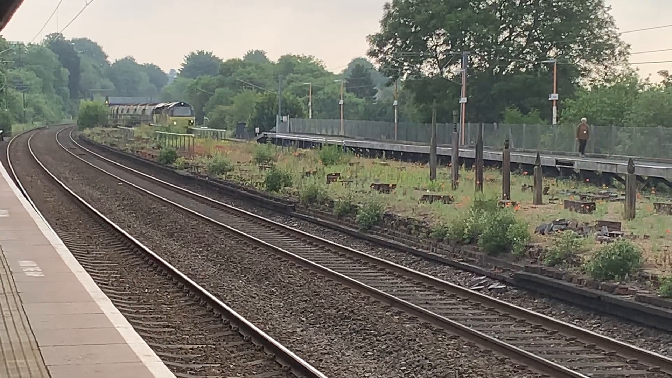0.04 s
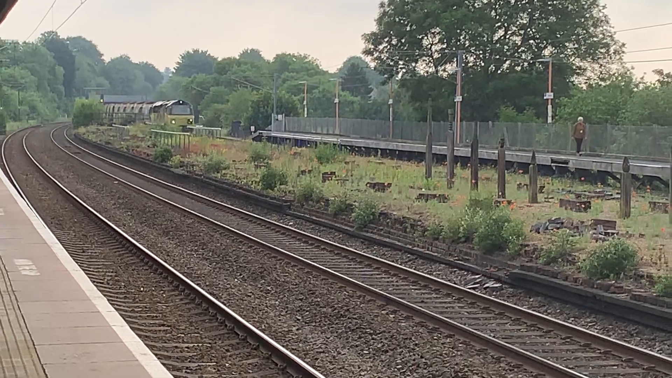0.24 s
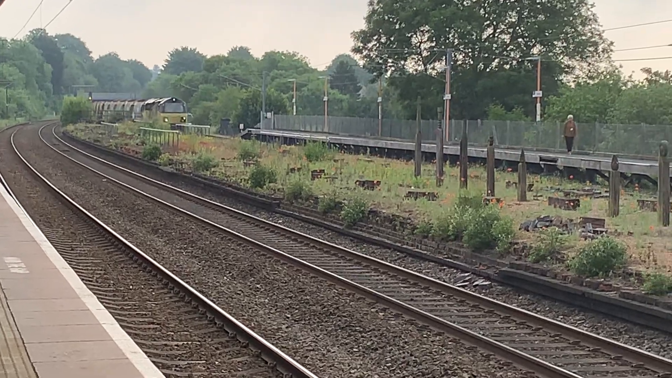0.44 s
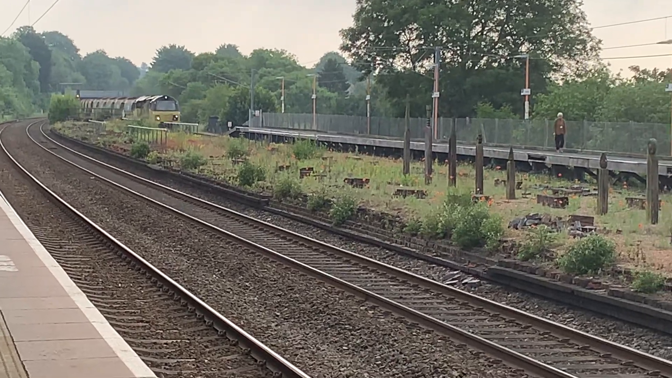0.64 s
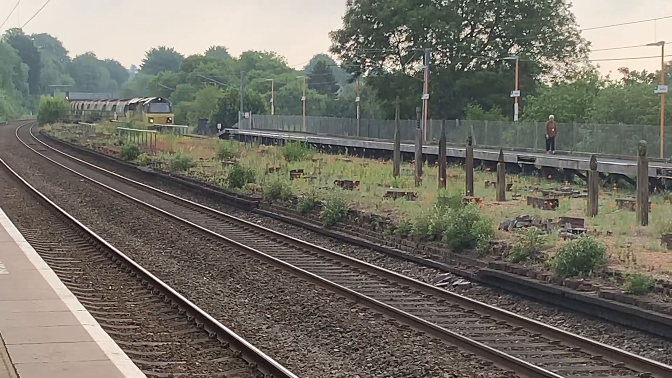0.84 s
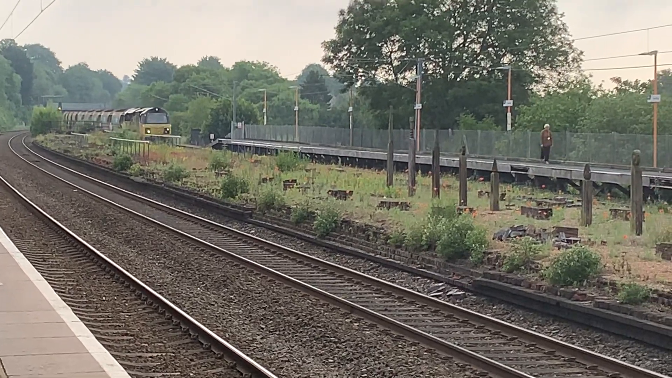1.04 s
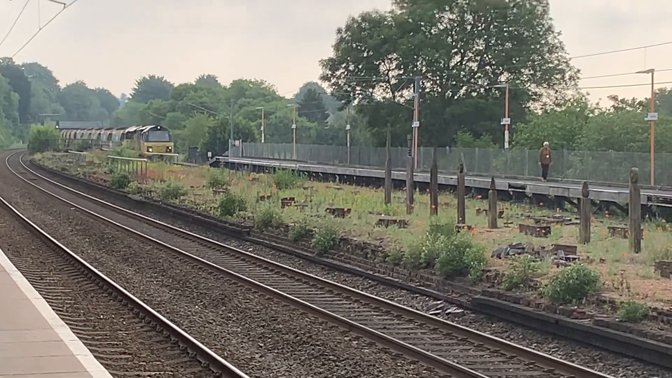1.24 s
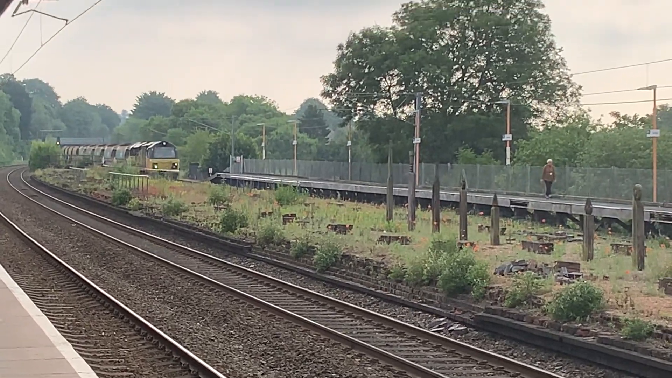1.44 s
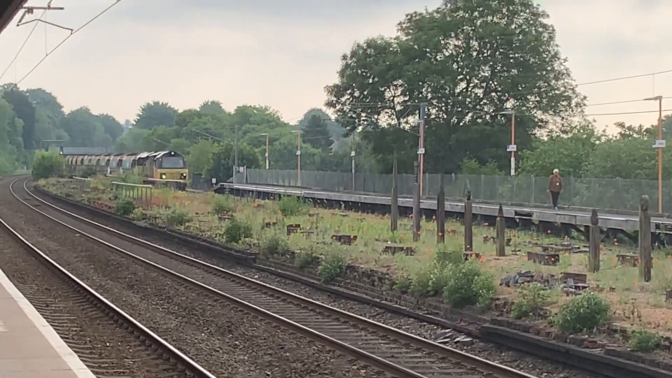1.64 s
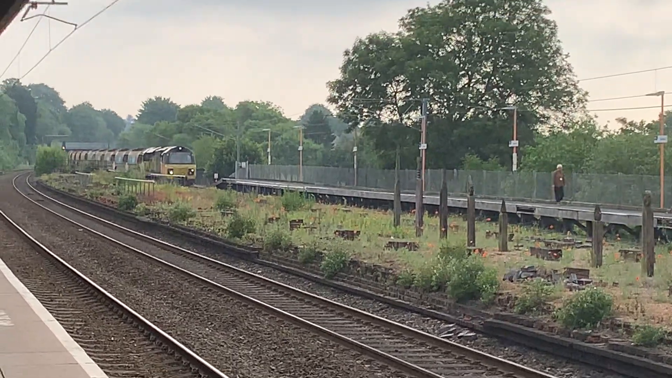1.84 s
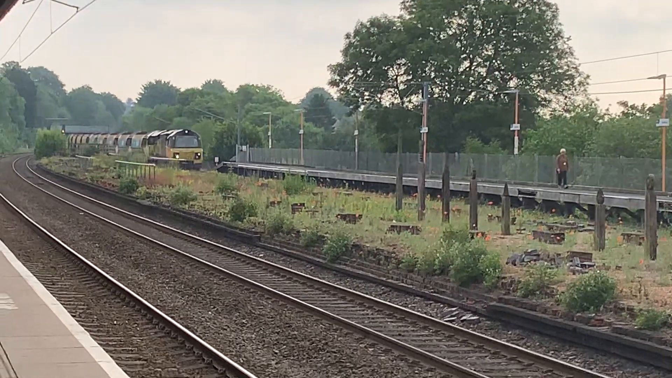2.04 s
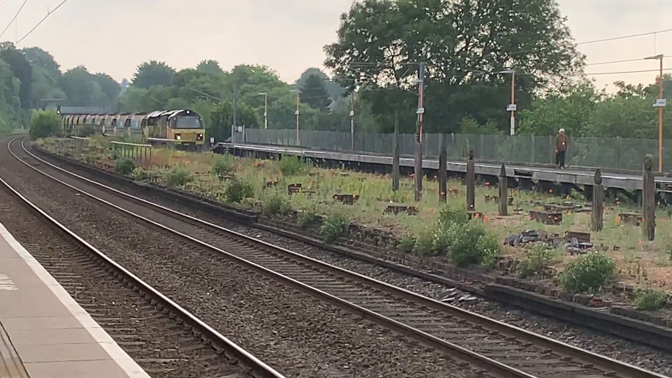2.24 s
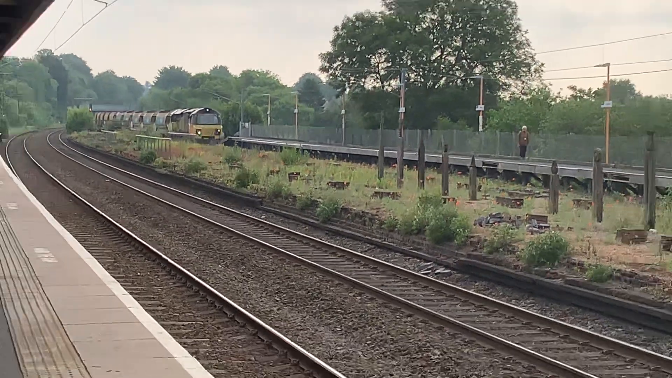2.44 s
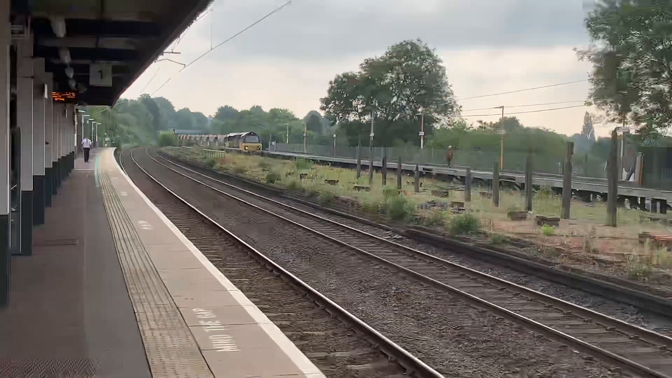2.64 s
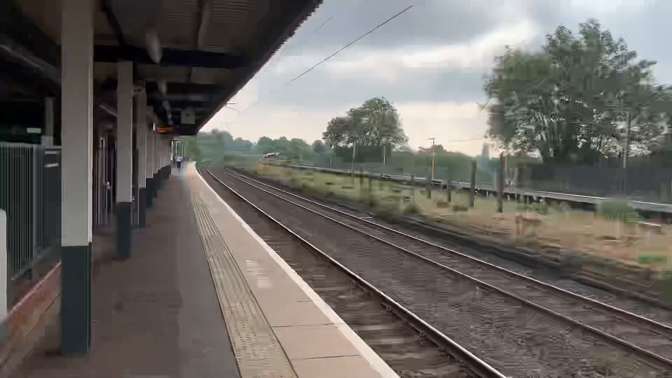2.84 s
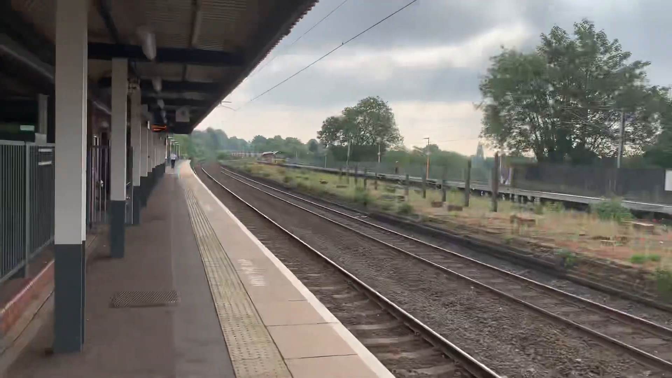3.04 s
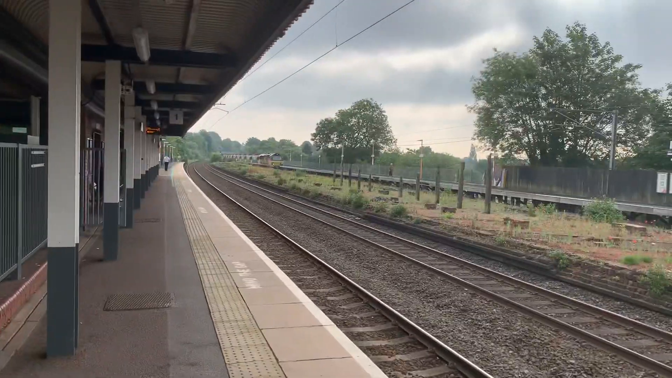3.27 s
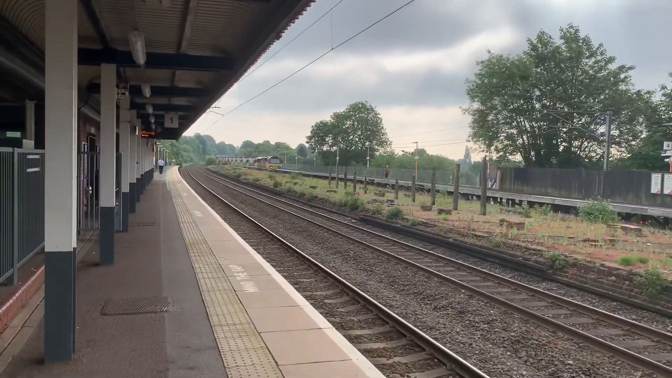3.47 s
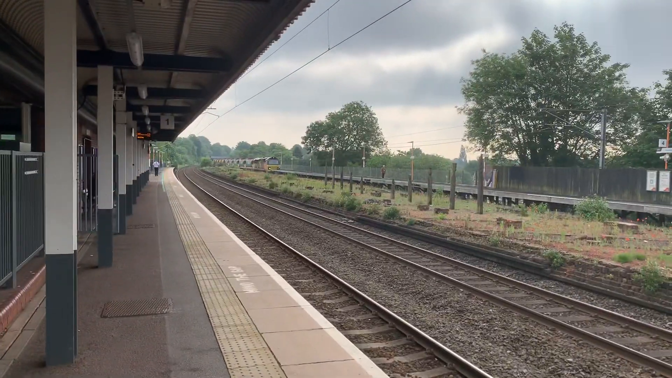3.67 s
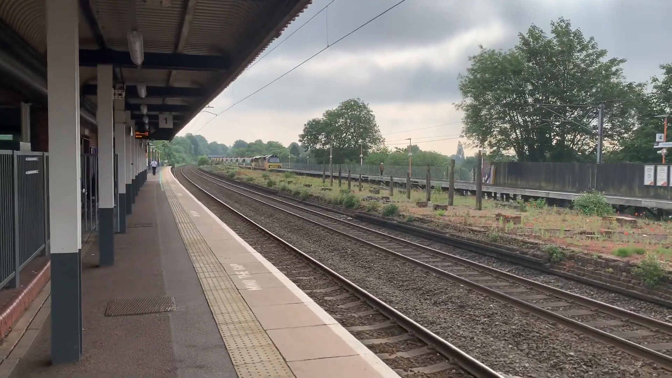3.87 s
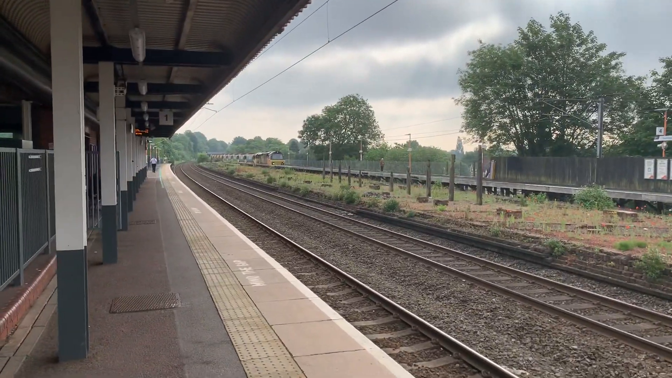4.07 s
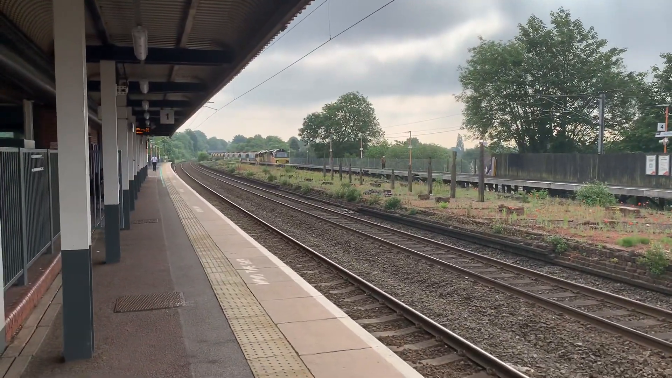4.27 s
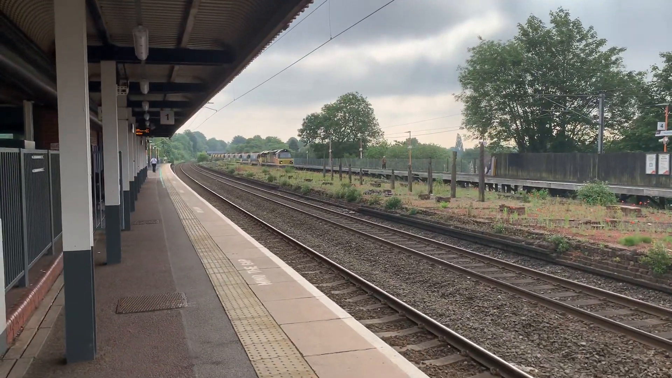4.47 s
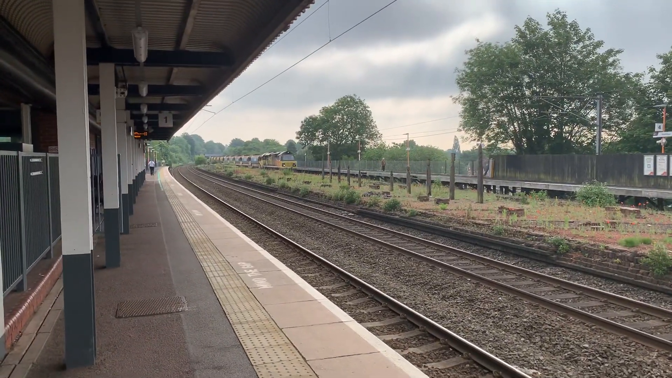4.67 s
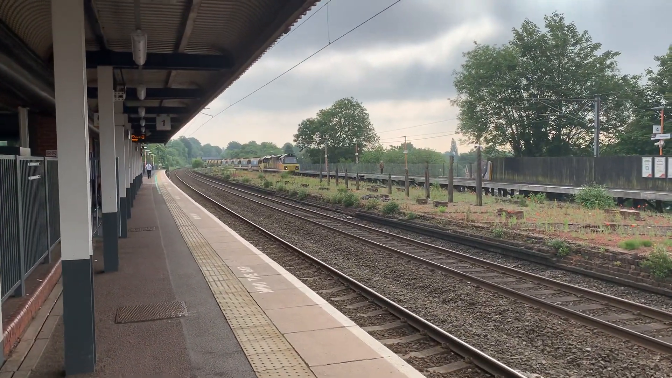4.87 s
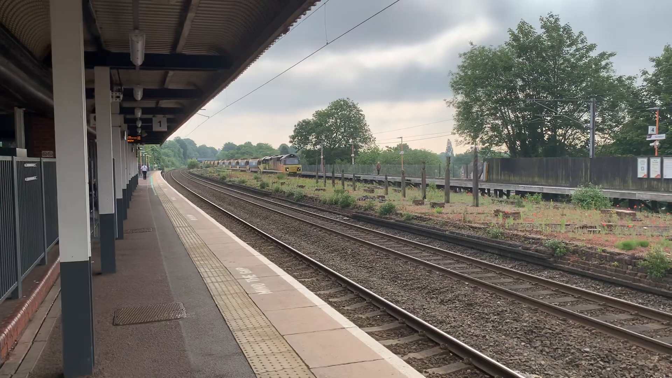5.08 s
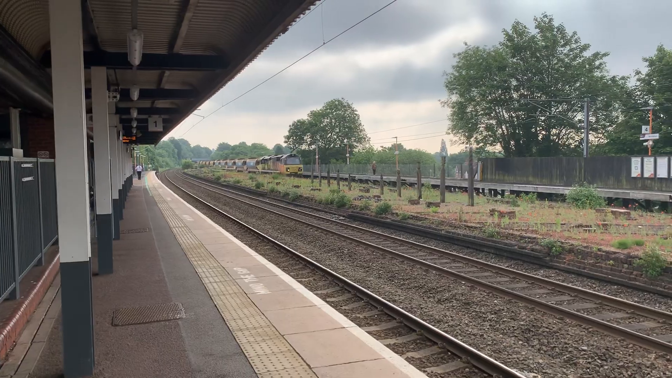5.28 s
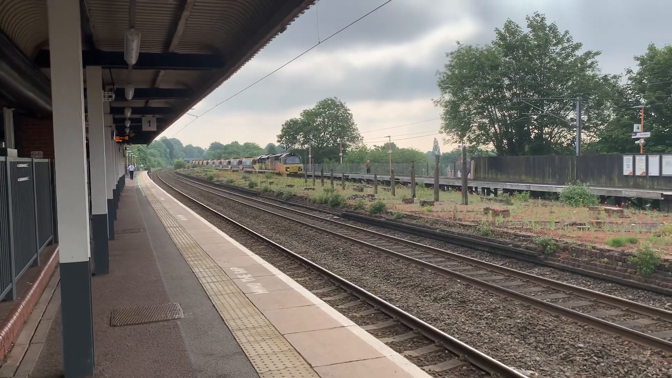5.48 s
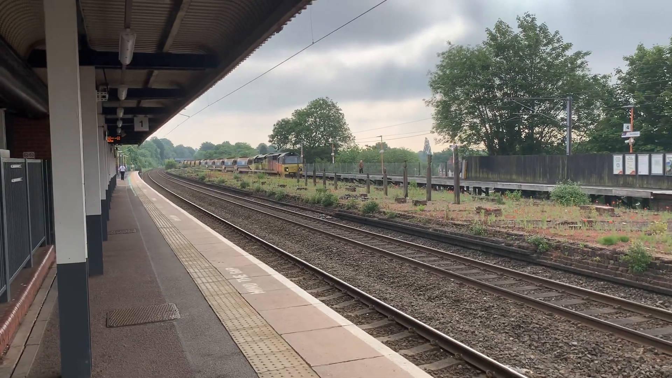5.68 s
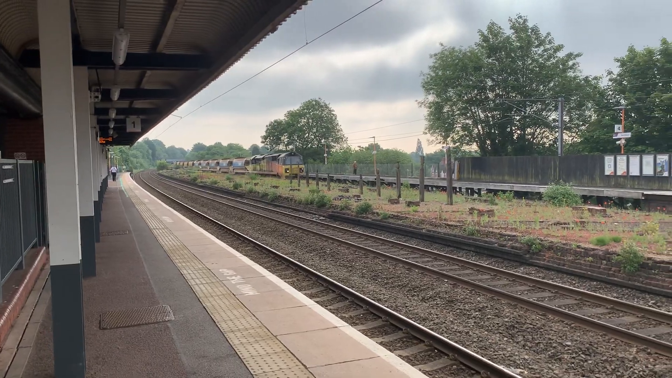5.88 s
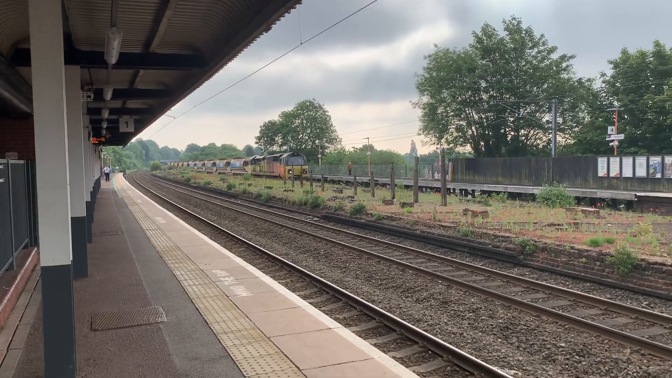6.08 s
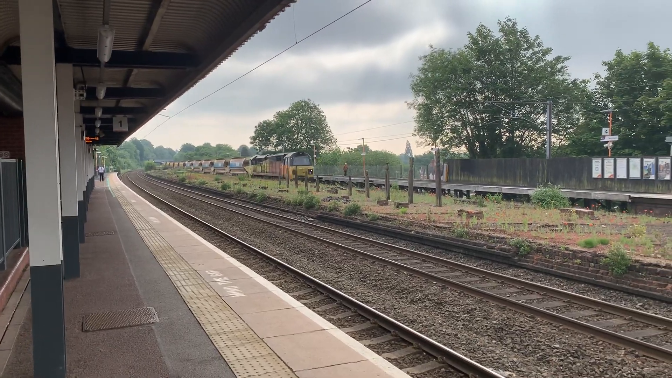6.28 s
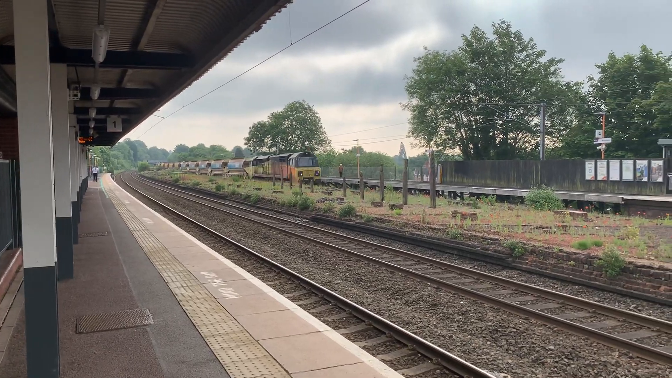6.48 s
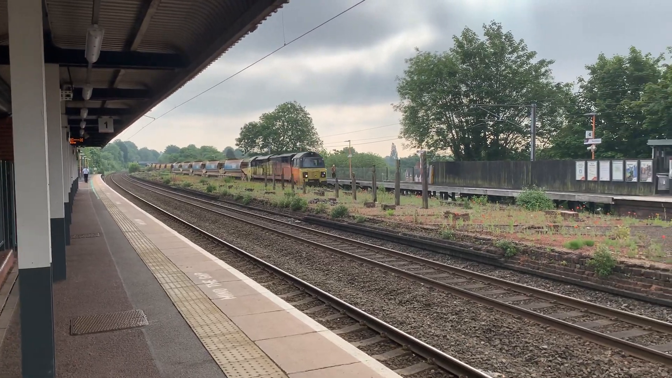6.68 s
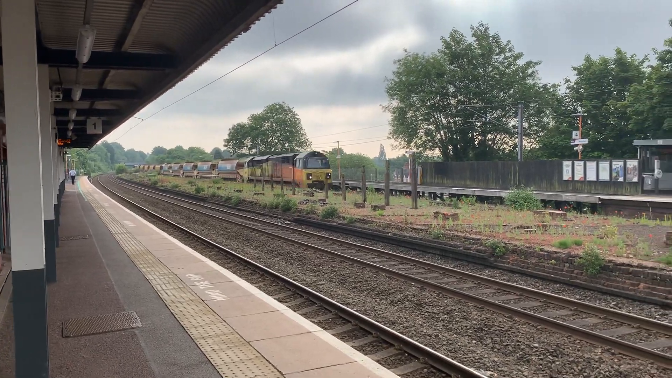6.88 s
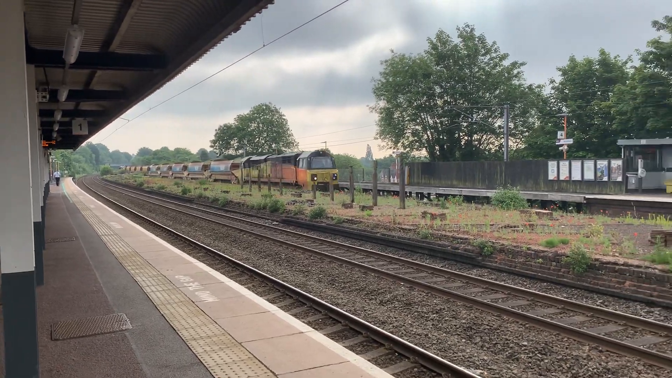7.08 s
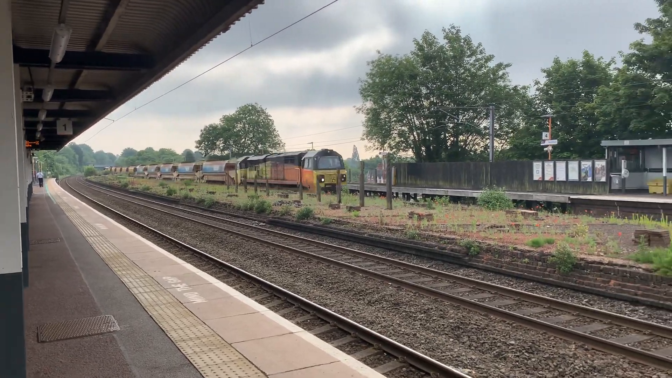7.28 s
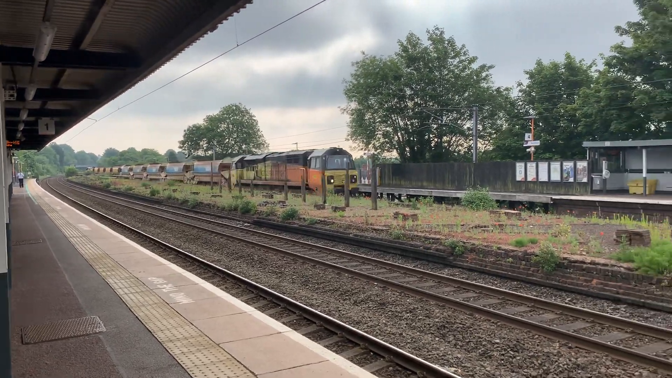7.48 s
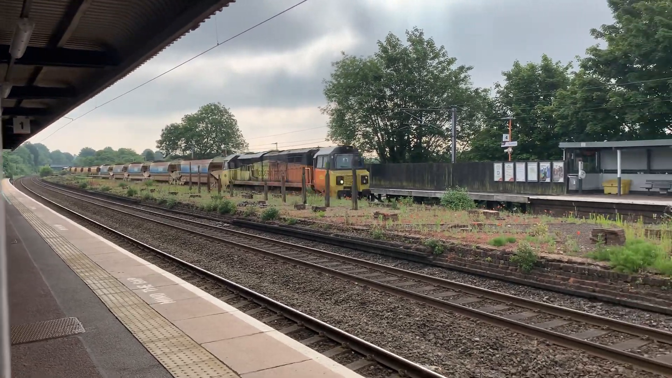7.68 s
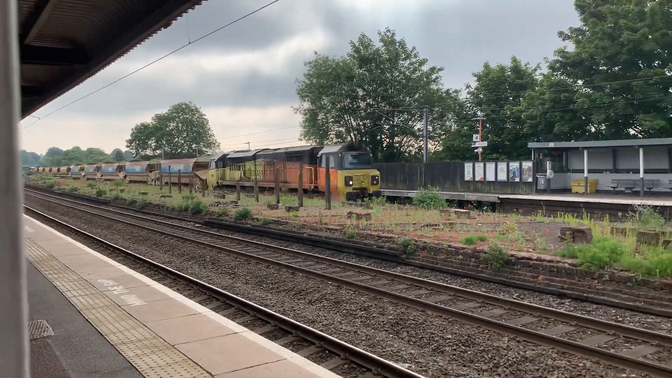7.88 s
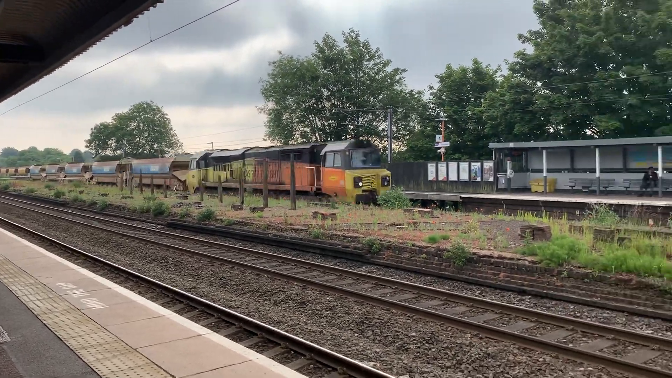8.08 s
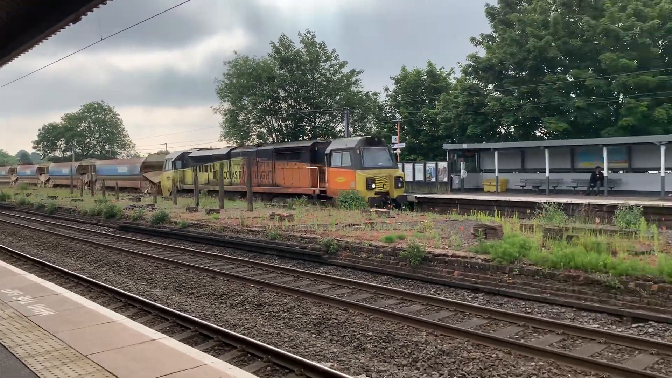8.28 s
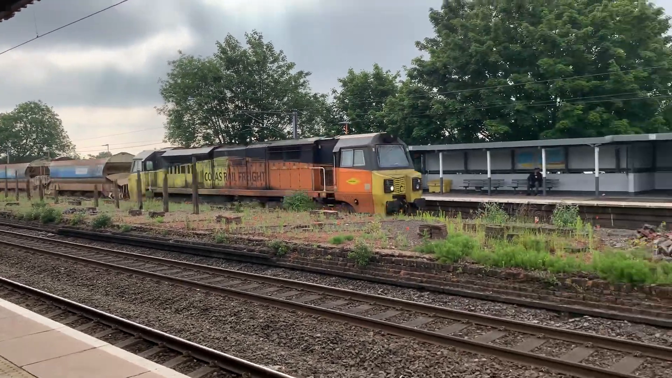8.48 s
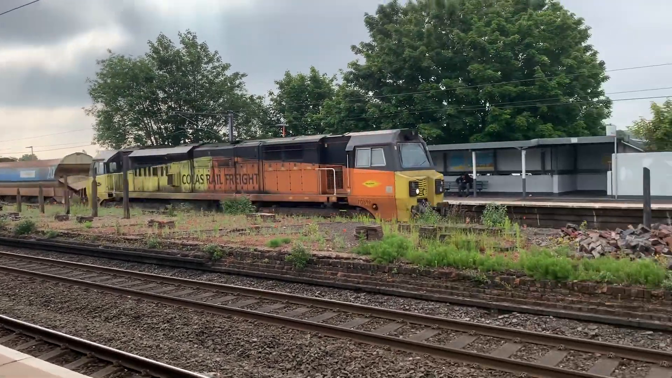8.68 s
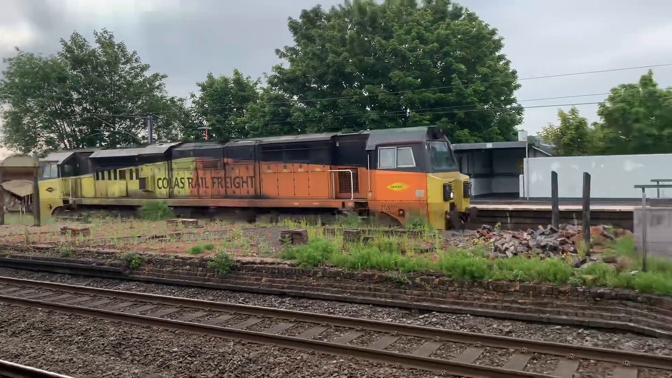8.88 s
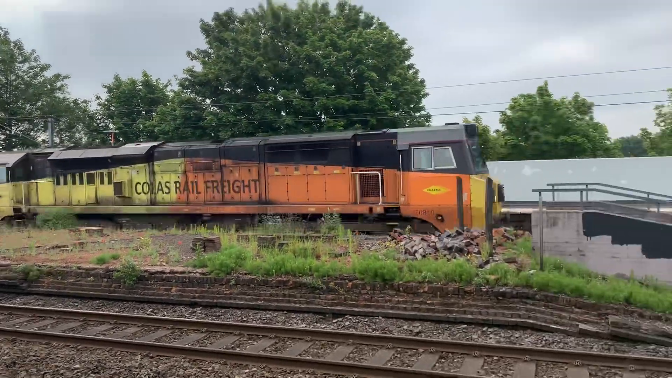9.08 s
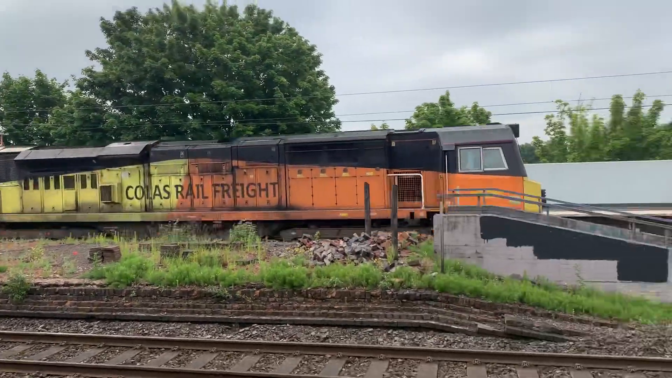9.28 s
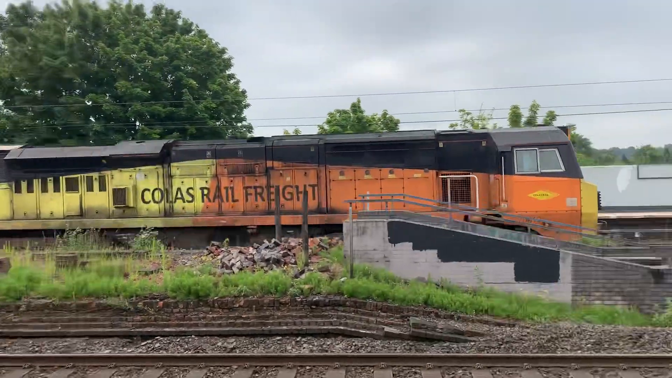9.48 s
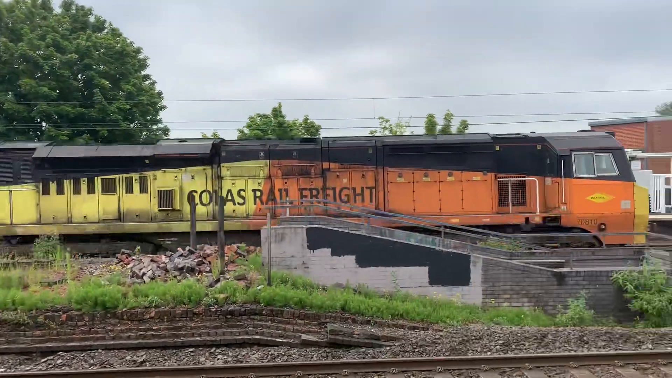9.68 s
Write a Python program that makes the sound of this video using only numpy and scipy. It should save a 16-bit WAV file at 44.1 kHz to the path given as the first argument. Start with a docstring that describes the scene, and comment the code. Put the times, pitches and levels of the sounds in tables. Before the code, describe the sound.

Handheld phone in stereo under a platform canopy, outdoors. Faint far twitter and a steady low diesel throb open the scene, with light clicks, hollow taps and a low thump from the hand. A small bird trills near one second and again near four. The train then grows louder and brighter, adding whining drives, breathy turbo whistle and wheel rush, ending at its loudest with slightly sinking pitch.

```python
"""A distant rumble and a throbbing exhaust come first, with far-off bird twitter and small finger ticks.
A diesel-electric freight locomotive nears a phone under a station canopy and draws level, growing louder and brighter.
Exhaust, drives, fan and turbocharger are sums of blurred tones; the roar is noise in narrow bands.
A nearby bird trills twice with falling whistles. The hand's ticks and rubbing are filtered noise,
its knocks are short fading tones, and one bump is a low swing of air that slows down."""
import sys
import numpy as np
from scipy import signal
from scipy.fft import rfft, irfft, next_fast_len
from scipy.io import wavfile
from scipy.ndimage import uniform_filter1d

SR = 44100
rng = np.random.default_rng(int(sys.argv[2]) if len(sys.argv) > 2 else 0)


def generate_wav(signal):
    """Clip the signal to [-1, 1] and save it as 16-bit WAV at the path in sys.argv[1]."""
    frames = np.transpose(np.atleast_2d(signal))
    scaled = np.clip(frames, -1, 1) * 32767
    pcm = np.round(scaled).astype(np.int16)
    wavfile.write(sys.argv[1], SR, pcm)


N = 428652

# Engine cycle as heard, sinking as the train draws level: [t/s, f/Hz]
ENGINE_CYCLE = [(0, 13.23), (5.7, 13.24), (6.3, 13.27), (7, 13.3), (8, 13.26), (8.4, 13.2), (8.85, 13.03),
                (9.72, 12.8)]
# Exhaust, one row per multiple ("order") of the cycle, from the third up, before swells:
# [far-off level/dB, alongside level/dB]
EXHAUST_ORDERS = [(-63.5, -37.5), (-46, -27.5), (-39.5, -20.5), (-59, -37), (-50, -28.5), (-48, -38),
                  (-46, -23), (-44.5, -30.5), (-29, -24.5), (-43, -34), (-48, -36), (-60, -30.5)]
# Main drive whine before its small wobble, rising with speed, then sinking: [t/s, base f/Hz]
DRIVE_WHINE = [(0, 269.5), (2.6, 271.5), (5, 273.5), (5.9, 275.7), (6.6, 275), (8.2, 274.3), (8.7, 271.3),
               (9.72, 265.5)]
# Turbocharger whistle before its small wobble: [t/s, f/Hz]
TURBO_WHISTLE = [(3.5, 7275), (6.8, 7370), (7.6, 7230), (8.3, 7120), (8.9, 6960), (9.72, 6680)]
# Roar of fans and wheels far off, before ROAR_FAR_DB is added: [f/Hz, level/dB]
FAR_ROAR = [(25, -40), (45, -6), (150, -5.5), (221, -19.5), (445, -30.5), (700, -22.5), (1080, -32),
            (1330, -33), (1800, -28.5), (2600, -42), (3000, -47), (4300, -45), (5500, -50), (7300, -61),
            (9500, -72.5), (11200, -74), (15500, -101.5)]
# The same roar alongside, before ROAR_NEAR_DB is added: [f/Hz, level/dB]
NEAR_ROAR = [(25, -24.5), (45, 1.5), (150, 0), (221, -2.5), (350, -5), (600, -4), (800, -12.5),
             (1100, -4.5), (1350, -8), (1650, -12), (2600, -19.5), (3440, -26.5), (7000, -27.5),
             (9500, -36.5), (10900, -36.5), (13000, -44), (15500, -64.5)]
# The two microphone openings: [f/Hz, left minus right level/dB, right leads/rad before the stereo picture flips,
# right leads/rad after it flips, likeness of the two sides/0-1]
MIC_PORTS = [(35, -3.5, .3, .1, .95), (65, -4.4, .3, -.1, .98), (95, -4.5, .25, -.7, .97),
             (120, -5, .3, -1.7, .98), (145, -4.4, .3, -1.8, .96), (180, -6, .3, -2.4, .95),
             (250, -4.5, .1, -3.9, .95), (375, -2, .3, -5.5, .87), (575, -6, 1, -6.8, .6),
             (825, -1, 3.8, -6.9, .55), (1100, 0, 5.8, -7.7, .55), (1550, 0, 5.7, -11, .45),
             (2150, 0, 6.1, -12.4, .5), (3000, -.5, 7.5, -16.5, .35), (4200, -2, 7.5, -18.6, .4),
             (5700, -3.5, 8.9, -17, .5), (7000, -.5, 8, -17.9, .55), (7800, 0, 9.2, -16, .93),
             (9400, 0, 9.6, -15.3, .95), (10300, 0, 12.5, -12.8, .93), (11700, 0, 12.6, -12.5, .95),
             (12600, 0, 15.6, -9.6, .93)]
# Fingers on the case: [t/s, level/dB, lowest f/Hz, highest f/Hz]
FINGER_TICKS = [(.11, -40, 3900, 4700), (0.192, -20, 890, 2360), (0.1915, -37, 3500, 7900),
                (1.776, -32, 1210, 3000), (1.793, -24.5, 990, 2000), (1.8295, -36, 2510, 6000),
                (1.843, -24, 700, 3000), (1.8426, -40, 5200, 9000), (1.875, -45, 2960, 9010),
                (2.2805, -28, 900, 2600), (2.293, -21, 600, 1800), (2.325, -30, 1300, 2600),
                (7.95, -32, 2000, 13000)]
# Hollow knocks: [t/s, peak level/dB, f/Hz that the pitch sinks to, time to fade by 60 dB/s]
HOLLOW_KNOCKS = [(.192, -35, 500, 0.017), (1.876, -18, 565, 0.028), (1.8955, -21, 547, .032),
                 (.248, -46, 580, .023), (.335, -40, 547, .032), (2.28, -31, 670, .03),
                 (2.283, -17.5, 235, 0.083), (1.844, -31, 426, 0.011), (2.289, -21.5, 570, 0.022),
                 (2.293, -16.5, 440, 0.012), (2.2975, -23.5, 427, .016), (2.466, -35, 420, 0.017)]
# Further drives, slightly slower, one of them sagging: [start t/s, end t/s, base f/Hz at start, base f/Hz at end]
SLOWER_DRIVES = [(2.6, 5.45, 262.5, 265.5), (3.9, 5.4, 265, 248)]
# Hum that holds its pitch as the train draws level: [start t/s, end t/s, f/Hz, level/dB]
STEADY_HUM = [(8.2, 9.4, 552, -37), (8.2, 9.4, 1100, -34), (7.9, 10.5, 2195, -41)]
# Faint far-off twitter, before it flickers: [start t/s, end t/s, f/Hz, level/dB, blur rate/Hz]
FAR_TWITTER = [(-1, 1.9, 2570, -65, 220), (2, 3.25, 4100, -64, 800), (-1, 1, 5450, -75, 200),
               (1.2, 2, 5480, -71, 200)]
# Lines of the main whine, before flicker and swells: [multiple of base f, far-off level/dB, alongside level/dB]
DRIVE_LINES = [(1, -61.5, -32.5), (2, -59, -29.5), (3, -72, -37.5), (4, -58, -30.5), (6, -68.5, -27),
               (8, -89.5, -43.5)]
# Parts of the train's sound that swell or dip: [t/s, half length/s, f/Hz, half width/octaves, level change/dB]
TRAIN_SWELLS = [(0.63, 0.18, 2100, 4.6, -1.5), (4.19, 0.15, 1085, 0.046, 6.5), (4.75, 0.15, 1070, .05, 7.5),
                (6.2, 0.21, 1085, .03, 10.5), (2.85, .12, 1080, .02, 3.5), (5.2, 0.061, 1580, 0.025, 7),
                (5.25, 0.16, 1580, 0.014, 4.5), (3.9, .12, 1580, .02, 2.5), (9.38, 0.33, 3000, 0.56, 2.5),
                (3.6, 0.24, 1580, 0.046, -2), (5.83, 0.55, 1085, 0.025, -5.5), (7.8, 0.57, 180, .04, -8),
                (8.5, 0.48, 159, .04, 4.5), (7, .6, 186, .04, 8.5), (9.15, .2, 119, .05, -10),
                (9.3, 0.28, 172, 0.036, -5.5), (9.4, .3, 35, .4, 4.5), (5.6, 0.34, 186, .04, 17),
                (6.25, 0.19, 186, .04, 9.5), (6.38, 0.28, 155, 0.24, 7), (6.623, 0.035, 7600, 3.3, 4),
                (4.8, 0.15, 1700, 0.2, -12), (7.04, 0.5, 1084, 0.085, 6), (8.3, 0.25, 140, 0.1, 4),
                (2.21, 0.66, 258, 0.23, 8.5), (3.6, 0.83, 580, .12, 4.5), (9.85, 0.51, 265, 0.31, 6),
                (5.8, 2.9, 7400, 0.2, 7.5), (0.19, 1.3, 310, 0.38, 7), (7.8, 0.99, 1651, 0.042, 12),
                (5.3, 2.2, 727, 0.12, 7), (6.86, 0.83, 2730, 0.11, 6), (7.66, 0.67, 162, 0.21, 7),
                (5.9, .5, 172, .04, 8.5), (6, .5, 76, .4, 1.5), (3, 1, 1090, 0.095, 1.5),
                (.2, 0.79, 1300, 0.49, 3), (7.65, 0.65, 267, 0.085, 10), (5.9, 0.22, 150, 0.2, 7),
                (8.21, 0.75, 346, 0.22, 7), (8.6, 0.25, 145, 0.12, -9.5), (12, 0.49, 190, 0.094, 7),
                (8.7, 0.28, 40, .25, 8), (9.45, 0.04, 383, 0.092, 13.5), (8.6, 0.11, 114.7, 0.14, 3.5),
                (9.73, 0.34, 63.4, 0.29, -15)]
# Bird trills, before each note's scatter: [t/s, level/dB, first gap/s]
BIRD_TRILLS = [(1.1615, -53.5, .058), (3.9385, -48.5, .061)]
# Echoes of each bird note: [delay t/s, level/dB against the note]
BIRD_ECHOES = [(.014, -9), (.023, -11), (.035, -14), (.05, -17)]
# One list per slower drive, before swells: [multiple of base f, far-off level/dB, alongside level/dB]
SLOWER_DRIVE_LINES = [
    [(4, -56.5, -41.5), (6, -59, -31.5)],
    [(4, -58, -39.5), (6, -67, -44)],
]
# Soft noise puffs, before patchiness: the hand sliding on the case, and one short far-off twitter at .46 s:
# [t/s, half length/s, level/dB, lowest f/Hz, highest f/Hz]
SOFT_PUFFS = [(0.191, 0.0089, -46, 200, 2460), (1.82, 0.05, -58, 500, 2830), (1.785, .02, -57, 1000, 3000),
              (.46, .018, -65, 3300, 3900), (2.294, 0.011, -43, 300, 1500), (2.33, .09, -55, 1400, 2700),
              (1.87, .03, -58, 1500, 3000)]
# A rough, wavering band that passes through the roar: (start t/s, end t/s, f/Hz, level/dB)
WARBLE = (6, 7, 1769, -38.5)
SLOWER_DRIVE_ROUGHNESS = (.85, .95)  # smeared share of each slower drive, 0-1

TIME = np.arange(N) / SR
STEP = TIME[::256]  # coarse times for slow changes
SIZE = next_fast_len(N + SR)
FREQ = np.arange(SIZE // 2 + 1) * SR / SIZE
SPEED_M_S, LEVEL_WITH_S, BESIDE_M = 15, 9.316, 20.4  # the train's straight path past the phone
FLIP_S = (6.33, 6.45)  # start and end of the stereo picture's flip
ROAR_FAR_DB, ROAR_NEAR_DB = -12, -1
TURBO_FAR_DB, TURBO_NEAR_DB = -86, -42
FAN_ORDER, FAN_FAR_DB, FAN_NEAR_DB = 28, -72, -30.5
THROB_LAG, THROB_START, THROB_SPREAD = -.23, .1, .03  # cycles, cycles per order, cycles per order squared
INVERT_ORDER = 14  # above a null of the silencer the orders turn upside down
SLOWING_S, NOTE_SCATTER_DB = 0.0052, 1.2
BUMP_S, BUMP_DB = 2.283, -4.5
FADE_S = .1
TOP_HZ = 15500


def undb(db):
    """Turn a level in dB into a gain."""
    return 10 ** (np.asarray(db) / 20)


def columns(rows):
    """Join the points of a time table with straight lines, one curve per column."""
    s, *cols = np.transpose(rows)
    return [np.interp(TIME, s, c) for c in cols]


def along(hz, points, values):
    """Read between table values, with pitch spaced in octaves."""
    return np.interp(np.log(np.maximum(hz, 1)), np.log(points), values)


def walk(rate):
    """Wander at random: levels last 1 / rate s each, smoothed twice, with a spread near 1."""
    steps = np.repeat(rng.standard_normal(8192), 4)
    smooth = uniform_filter1d(uniform_filter1d(steps, size=4), size=4)
    return 1.3 * np.interp(4 * (1 + rate * TIME), np.arange(len(smooth)), smooth)


def tone(hz, blur_hz, rough, start_cycles):
    """A tone of rms about 1, part steady, part smeared by air; rows: direct, and scattered under the canopy."""
    rough = np.clip(rough, 0, 1)
    smear = [np.sqrt(rough / 2) * (walk(blur_hz) + 1j * walk(blur_hz)) for _ in range(2)]
    steady = np.sqrt(1 - rough) * np.array([[1], [-1j]])
    cycles = np.cumsum(hz) / SR + start_cycles
    return np.sqrt(2) * np.real((steady + smear) * np.exp(2j * np.pi * cycles))


def add(out, s, sound):
    """Mix a short sound in at time s."""
    i = int(s * SR)
    out[i:i + len(sound)] += sound[:len(out) - i]


def nearness(t):
    """0 at the start, 1 alongside, following the dB gained as the distance shrinks."""
    metres = np.hypot(SPEED_M_S * (np.append(0, t) - LEVEL_WITH_S), BESIDE_M)
    return np.log(metres[0] / metres[1:]) / np.log(metres[0] / BESIDE_M)


def heard(hz, far_db, near_db, share=1):
    """Gain over time of a train sound at hz: it grows as the train nears, with swells and dips."""
    db = far_db + nearness(STEP) * (near_db - far_db)
    for s, half_s, centre_hz, octaves, swell_db in TRAIN_SWELLS:
        time_off = (STEP - s) / half_s
        pitch_off = np.log2(hz / centre_hz) / octaves
        db = db + share * swell_db * np.exp(-time_off ** 2 - pitch_off ** 2)
    return np.interp(TIME, STEP, undb(db))


def spell(start_s, end_s):
    """Fade in, hold, fade out."""
    return 1 / (1 + np.exp((start_s - TIME) / FADE_S)) / (1 + np.exp((TIME - end_s) / FADE_S))


def held(start_s, end_s, hz, db, blur_hz, rough):
    """A blurred tone of one pitch that sounds for a while."""
    return undb(db) * spell(start_s, end_s) * tone(np.full(N, 1. * hz), blur_hz, rough, 0)


def roar():
    """Fans and wheels: noise in quarter-octave bands that brighten as the train nears, each flickering."""
    noise = rfft(rng.standard_normal((2, SIZE)))  # rows: direct and scattered, as for a tone
    place = 4 * np.log2(np.maximum(FREQ, 1) / 25)  # quarter octaves above 25 Hz
    out = 0
    for k in range(38):
        hz = 25 * 2 ** (k / 4)
        band = irfft(noise * np.clip(1 - np.abs(place - k), 0, 1), SIZE)[:, :N]
        far_db = along(hz, *np.transpose(FAR_ROAR)) + ROAR_FAR_DB
        near_db = along(hz, *np.transpose(NEAR_ROAR)) + ROAR_NEAR_DB
        # around the throb the swells belong mostly to the exhaust
        share = .35 if 100 < hz < 240 else 1
        # low bands flicker less
        flicker_db = min(hz / 400, 1) * (min(.9, 1500 / hz) * walk(6) + 1.7 * walk(18) + 1.5 * walk(50))
        out = out + band * (heard(hz, far_db, near_db, share) * undb(flicker_db))
    return out


def exhaust():
    """Uneven cylinders repeat once a cycle, so every order sounds; the pipe spreads each throb in time."""
    cycle_hz, = columns(ENGINE_CYCLE)
    rough = .012 + .1 * nearness(TIME) ** 4
    out = 0
    for k, (far_db, near_db) in enumerate(EXHAUST_ORDERS, 3):
        start_cycles = THROB_LAG + (k >= INVERT_ORDER) / 2 + THROB_START * k - THROB_SPREAD * k ** 2
        gain = heard(k * cycle_hz[0], far_db, near_db)
        out = out + gain * tone(k * cycle_hz, 2.358, rough, start_cycles)
    return out


def drive_whine():
    """The main drive sings at multiples of one base pitch, which wobbles as the wheels run unevenly."""
    base_hz, = columns(DRIVE_WHINE)
    base_hz = base_hz * (1 + .0015 * walk(5))
    # close by, several axles and their echoes widen each line
    rough = .03 + .9 * nearness(TIME) ** 1.3
    out = 0
    for k, far_db, near_db in DRIVE_LINES:
        gain = heard(k * base_hz[0], far_db, near_db) * undb(1.5 * walk(9))
        out = out + gain * tone(k * base_hz, 14 * k, rough, 0)
    return out


def fan():
    """The fan tone keeps a fixed multiple of the engine cycle."""
    cycle_hz, = columns(ENGINE_CYCLE)
    fan_hz = FAN_ORDER * cycle_hz
    return heard(fan_hz[0], FAN_FAR_DB, FAN_NEAR_DB) * tone(fan_hz, 14, 1.0, 0)


def turbocharger():
    """A breathy whistle and its faint octave; the turbine never runs quite evenly."""
    turbo_hz, = columns(TURBO_WHISTLE)
    turbo_hz = turbo_hz * (1 + .003 * walk(40))
    whistle = undb(2.5 * walk(9)) * tone(turbo_hz, 240, 1, 0)
    octave = undb(-35.5) * tone(2 * turbo_hz, 300, 0.86, 0)
    return heard(turbo_hz[0], TURBO_FAR_DB, TURBO_NEAR_DB) * (whistle + octave)


def twitter():
    """Many distant calls smeared into narrow hiss that comes and goes."""
    return sum(undb(3 * walk(4)) * held(*row, 1) for row in FAR_TWITTER)


def handling():
    """Ticks of filtered noise, ringing knocks and one bump, carried through the case."""
    out, t = np.zeros(N), np.arange(int(.08 * SR)) / SR
    # each tick is a sharp burst with a weaker tail
    scrape = (1 - np.exp(-t / .0003)) * (1.4 * np.exp(-t / .0013) + .12 * np.exp(-t / .012))
    for s, db, low_hz, high_hz in FINGER_TICKS:
        sos = signal.butter(3, [low_hz, high_hz], "band", fs=SR, output="sos")
        noise = rng.standard_normal(len(t))
        add(out, s, undb(db) * signal.sosfilt(sos, noise * scrape))
    for s, db, hz, t60 in HOLLOW_KNOCKS:
        ring = (1 - np.exp(-(t / 0.0021) ** 2)) * undb(-60 * t / max(t60, .003))
        sag = 1 + .2 * np.exp(-t / 0.0035)  # the pitch starts a fifth part higher
        knock = ring / ring.max() * np.sin(2 * np.pi * np.cumsum(hz * sag) / SR)
        add(out, s - .001, undb(db) * knock)  # starts 1 ms early
    # the air at the ports is squeezed and rings down, slower with each swing
    swing = np.sin(2 * np.pi * np.cumsum(62 + 150 * np.exp(-t / .008)) / SR)
    squeeze = (t / .012 * np.exp(1 - t / .012)) ** 2
    add(out, BUMP_S, -undb(BUMP_DB) * swing * squeeze)
    return out


def soft_puffs():
    """Soft, patchy noise in limited pitch ranges: the hand rubbing the case, and one short far-off twitter."""
    out = 0
    for s, half_s, db, low_hz, high_hz in SOFT_PUFFS:
        sos = signal.butter(4, [low_hz, high_hz], "band", fs=SR, output="sos")
        puff = signal.sosfilt(sos, rng.standard_normal(N))
        envelope = np.exp(-((TIME - s) / half_s) ** 2)
        out = out + undb(db + 3.8 * walk(39.6)) * envelope * puff / puff.std()
    return out


def bird():
    """Trills of four falling whistles that slow down, each whistle with a few echoes."""
    out, t = np.zeros(N), np.arange(int(.03 * SR)) / SR
    shape = (1 - np.exp(-t / .0015)) * np.exp(-(t / .014) ** 3 - t / .02)
    for s, db, gap_s in BIRD_TRILLS:
        for k, size in enumerate(rng.standard_normal(4)):
            start = s + k * gap_s + k * (k - 1) / 2 * SLOWING_S
            gain = undb(db + NOTE_SCATTER_DB * size)
            fall_hz = 900 + 70 * k + 60 * size  # later notes tend to fall further
            note_hz = 4430 - fall_hz * (t / .014) ** 1.2
            note = shape * np.sin(2 * np.pi * np.cumsum(note_hz) / SR)
            add(out, start, gain * note)
            for late_s, echo_db in BIRD_ECHOES:
                add(out, start + late_s, gain * undb(echo_db) * note)
    return out


def slower_drives():
    """Further drives whine for a while at multiples of their own gliding base pitch."""
    out = 0
    for row, lines, rough in zip(SLOWER_DRIVES, SLOWER_DRIVE_LINES, SLOWER_DRIVE_ROUGHNESS):
        start_s, end_s, *hz = row
        base_hz = np.interp(TIME, [start_s, end_s], hz)
        for k, far_db, near_db in lines:
            gain = spell(start_s, end_s) * heard(k * hz[0], far_db, near_db)
            out = out + gain * tone(k * base_hz, 8 * k, rough, 0)
    return out


def warble():
    """Fast, mostly random wavering spreads one pitch into a rough band."""
    return held(*WARBLE, 350, 0.86)


def hum():
    """Blurred tones of fixed pitch fade in late."""
    return sum(held(*row, 40, 1.0) for row in STEADY_HUM)


def ports(sound):
    """The right port hears direct sound with its own phase, plus scattered sound that the left one lacks."""
    hz, balance_db, before_rad, after_rad, direct = np.transpose(MIC_PORTS)
    likeness = along(FREQ, hz, direct)
    tilt = undb(along(FREQ, hz, balance_db) / 2)
    straight, scattered = rfft(sound, SIZE)

    def right_port(lead_rad):
        """Shift the direct sound's phase and blend in the scattered sound."""
        shifted = likeness * np.exp(1j * along(FREQ, hz, lead_rad)) * straight
        mixed = shifted + np.sqrt(1 - likeness ** 2) * scattered
        return irfft(mixed / tilt, SIZE)[:N]

    # the phone's stereo processing switches abruptly
    flip = np.interp(TIME, FLIP_S, [0, 1])
    left = irfft(straight * tilt, SIZE)[:N]
    right = (1 - flip) * right_port(before_rad) + flip * right_port(after_rad)
    return np.array([left, right])


def scene():
    """Train and birds pass through the two ports; handling and soft puffs are added straight to both sides."""
    train = roar() + exhaust() + drive_whine() + fan() + turbocharger()
    train = train + slower_drives() + warble() + hum()
    # the bird joins both rows, direct and scattered
    air = ports(train + twitter() + bird())
    close = handling() + soft_puffs()
    return air + close * undb([[.5], [-.5]])  # slightly louder on the left


def record(dry):
    """The phone rounds the loudest peaks and cuts the top."""
    rounded = np.tanh(.8 * dry) / .8
    return signal.sosfilt(signal.ellip(8, .2, 70, TOP_HZ, fs=SR, output="sos"), rounded)


dry = scene()
out = record(dry)
generate_wav(out)
```